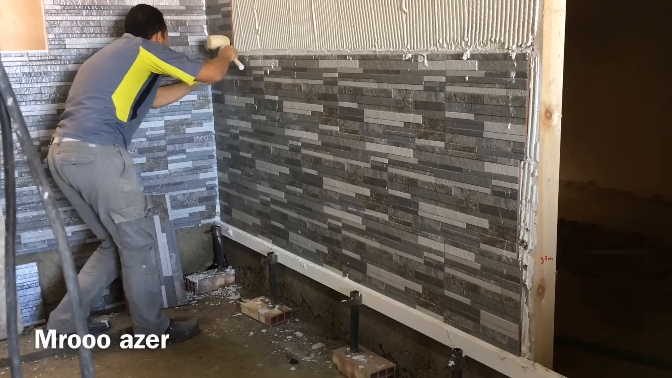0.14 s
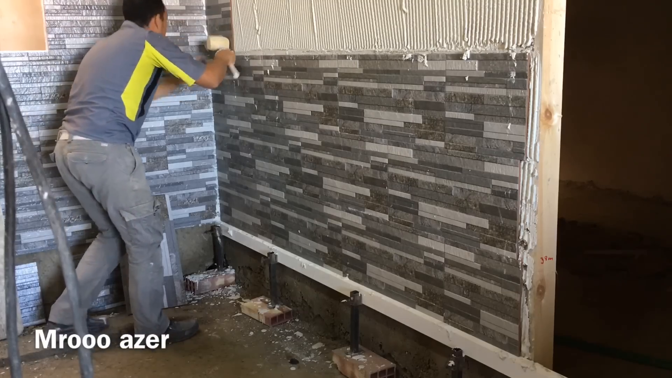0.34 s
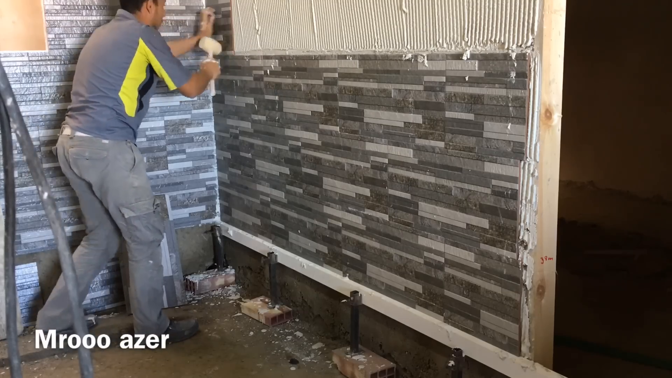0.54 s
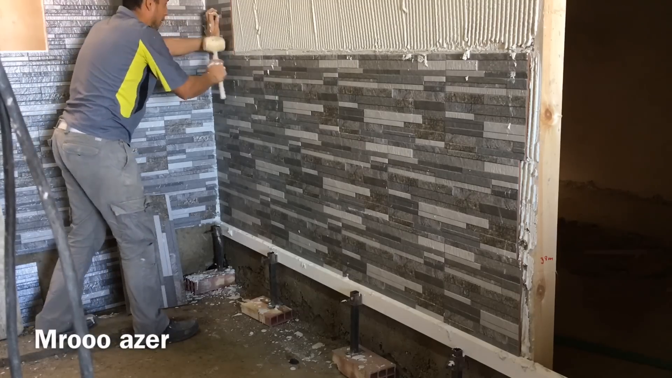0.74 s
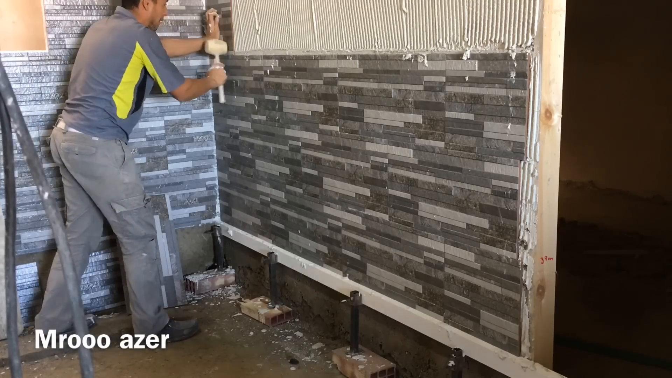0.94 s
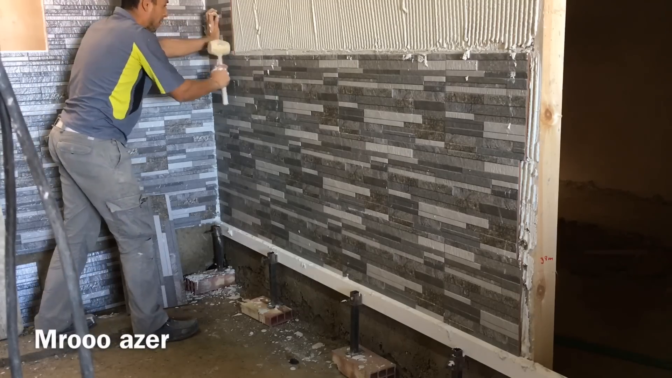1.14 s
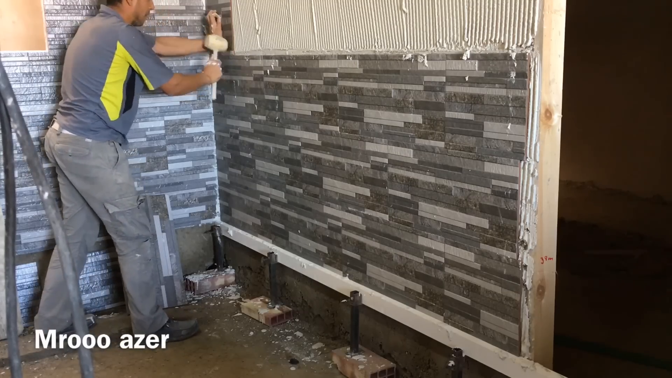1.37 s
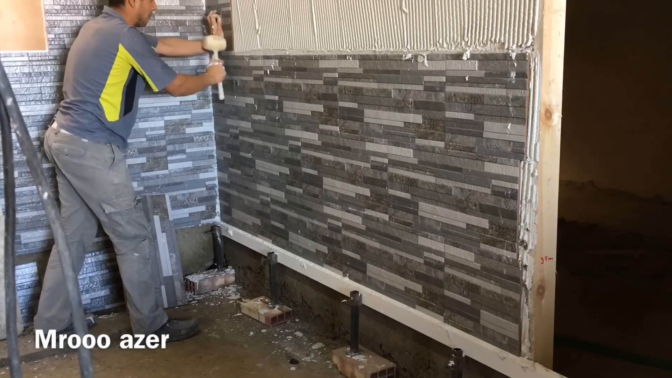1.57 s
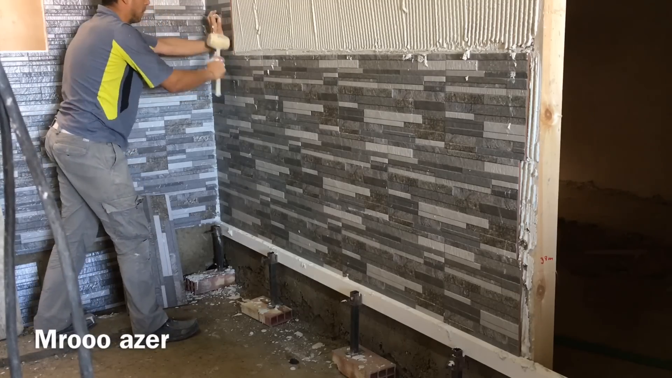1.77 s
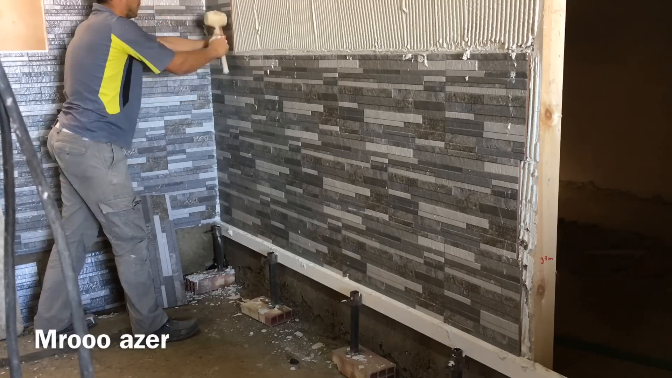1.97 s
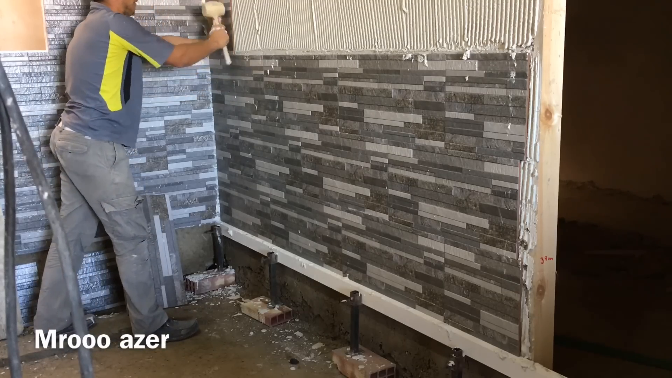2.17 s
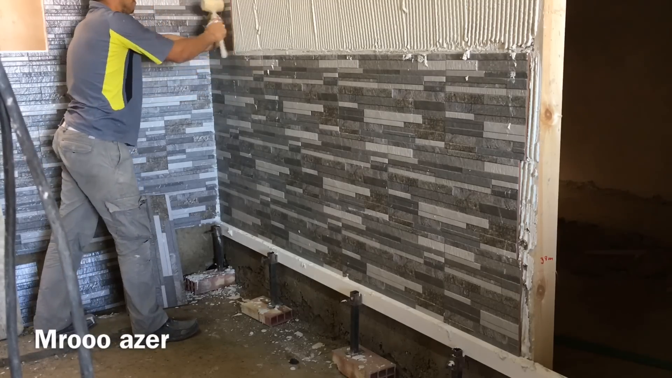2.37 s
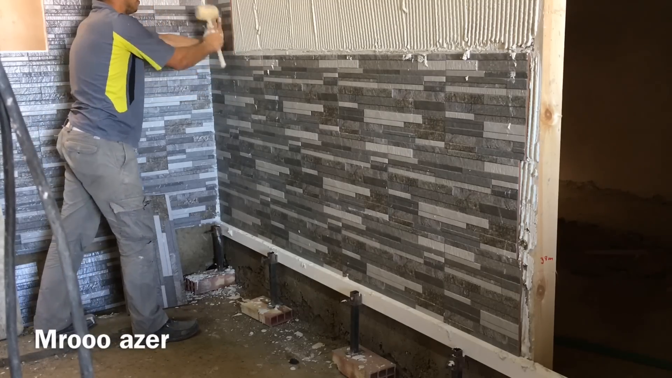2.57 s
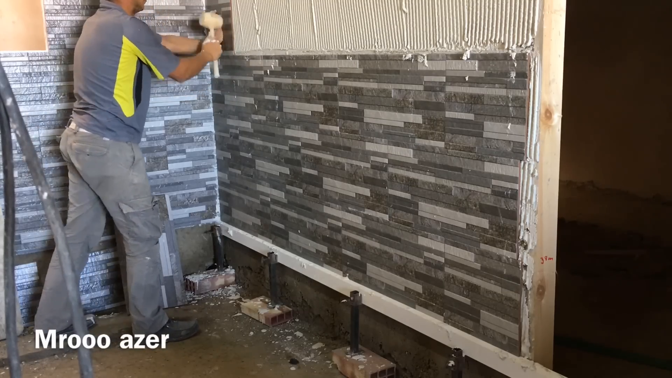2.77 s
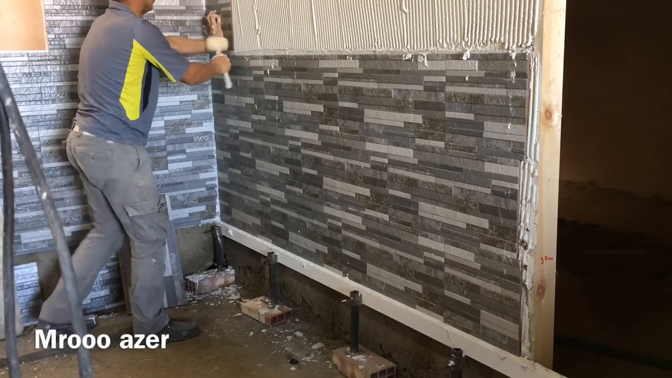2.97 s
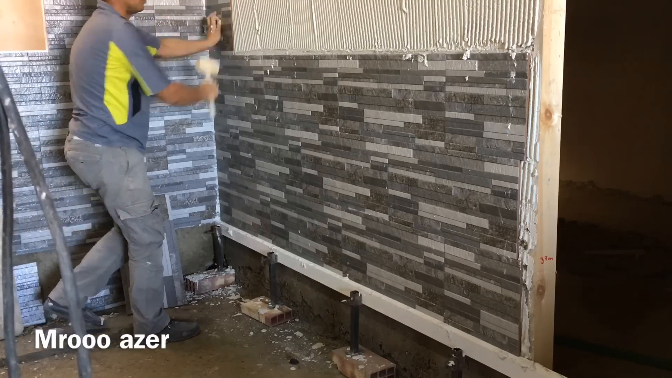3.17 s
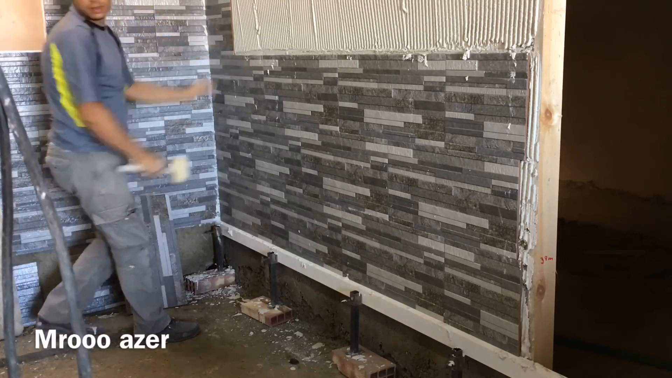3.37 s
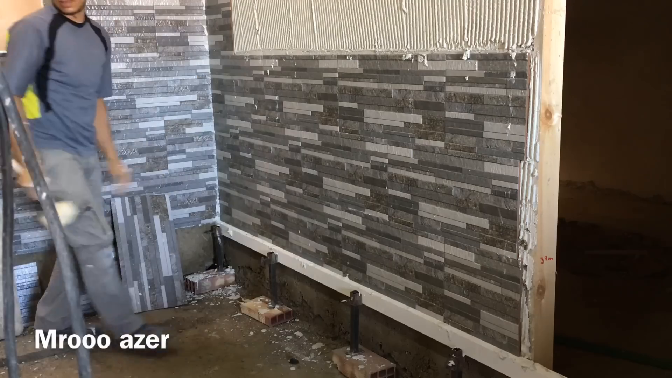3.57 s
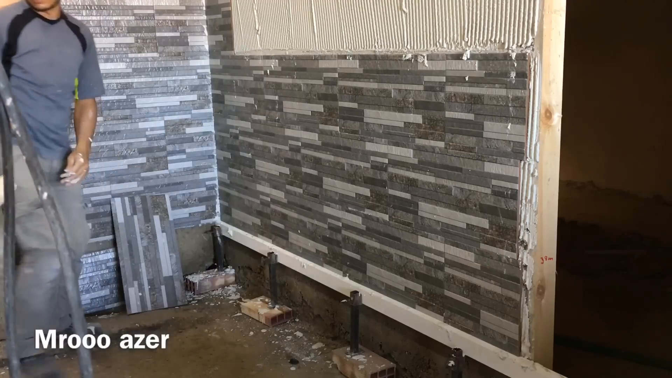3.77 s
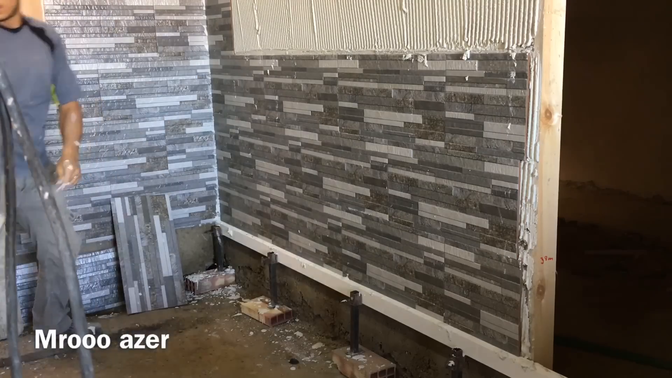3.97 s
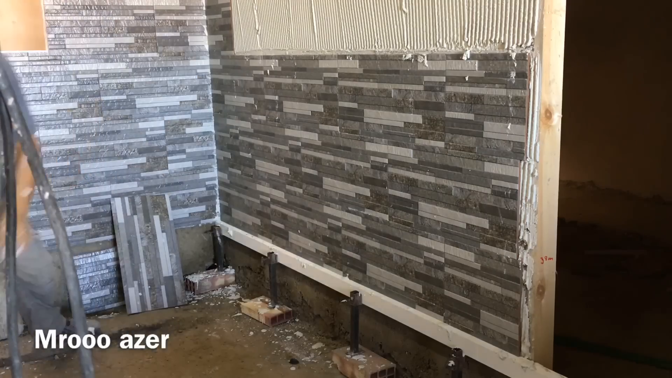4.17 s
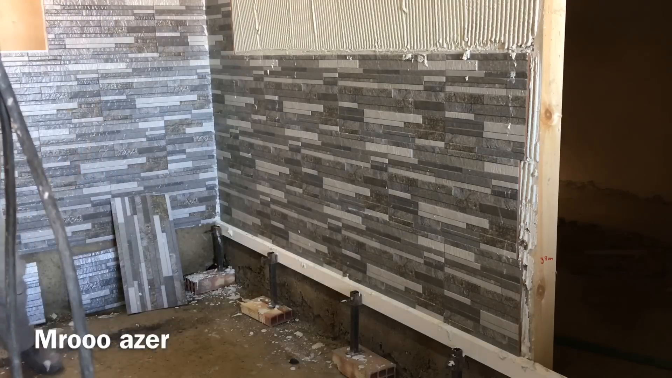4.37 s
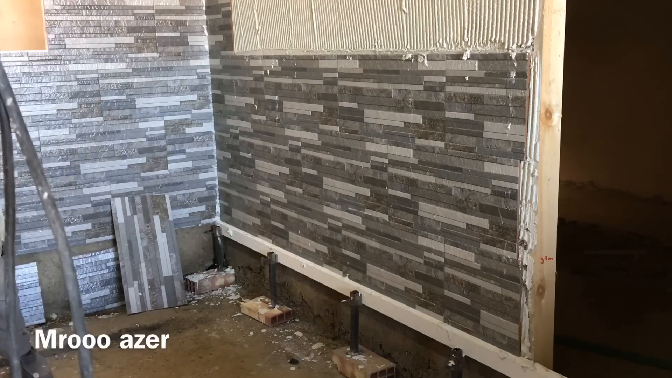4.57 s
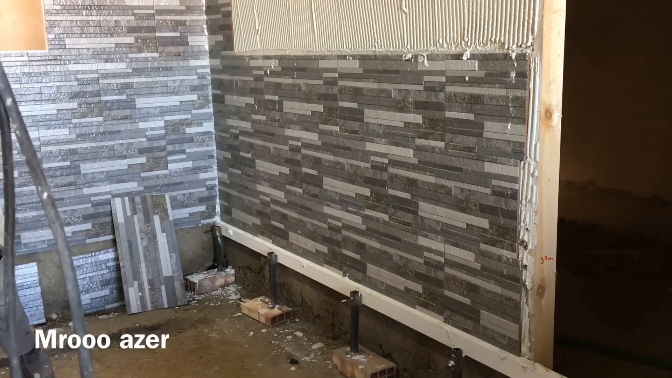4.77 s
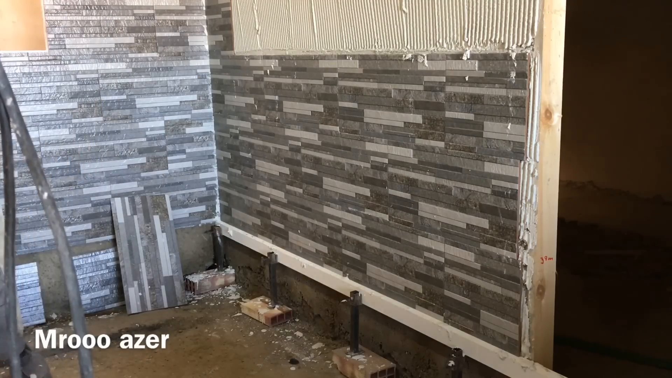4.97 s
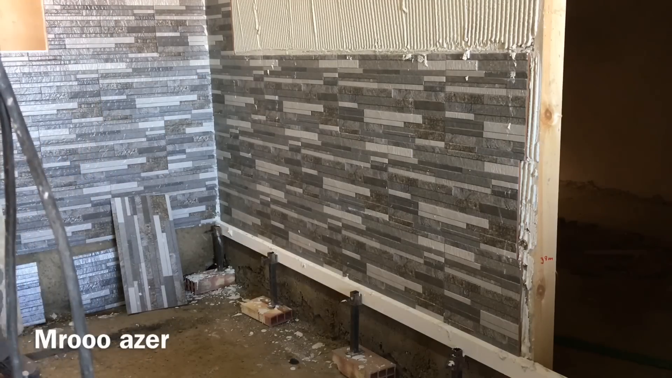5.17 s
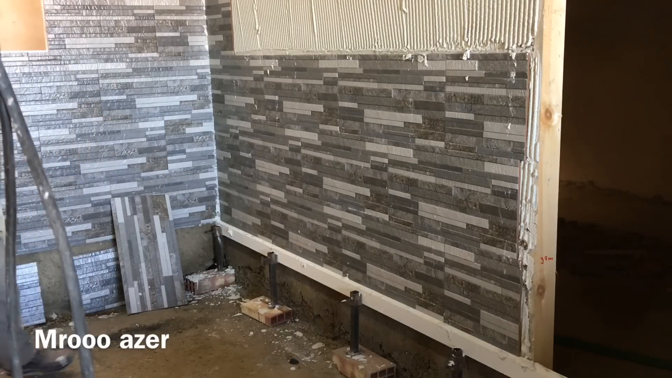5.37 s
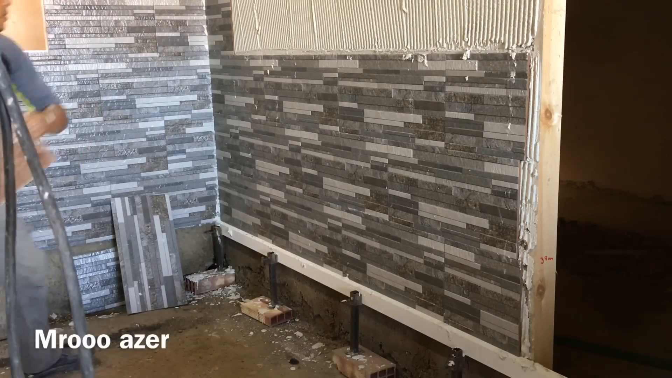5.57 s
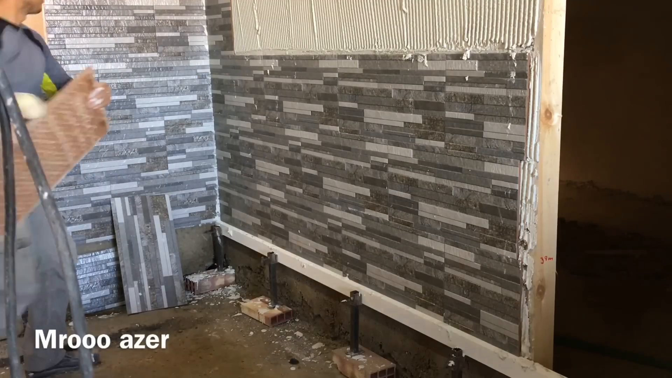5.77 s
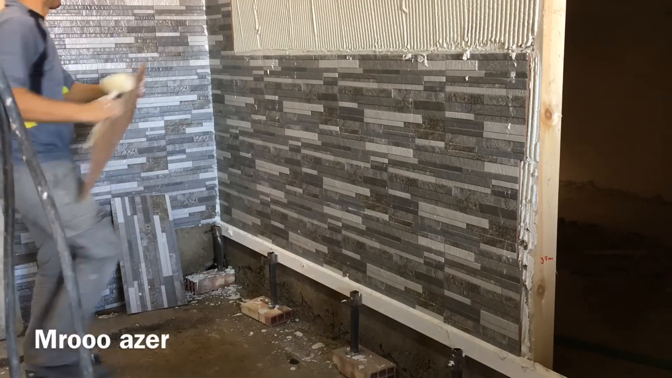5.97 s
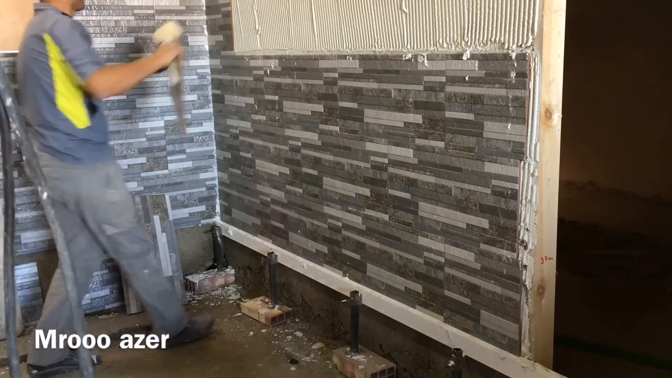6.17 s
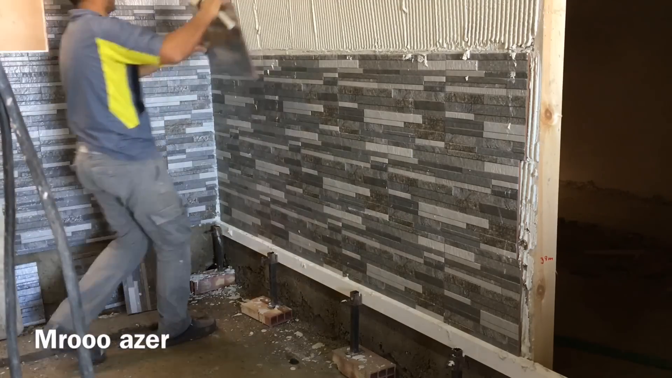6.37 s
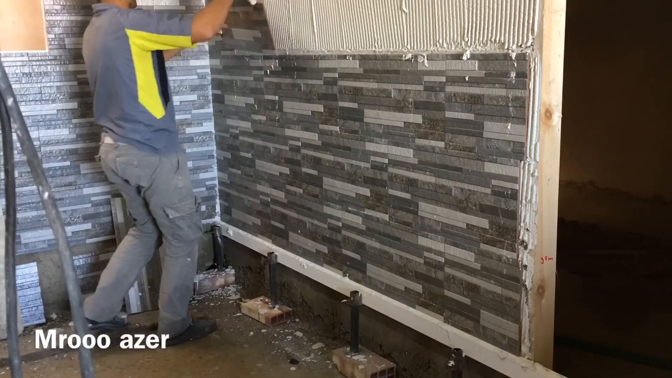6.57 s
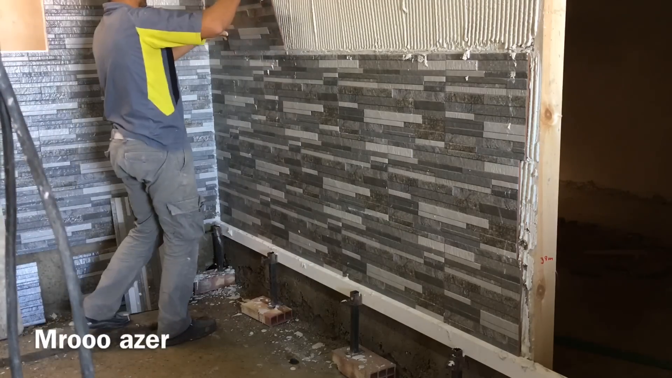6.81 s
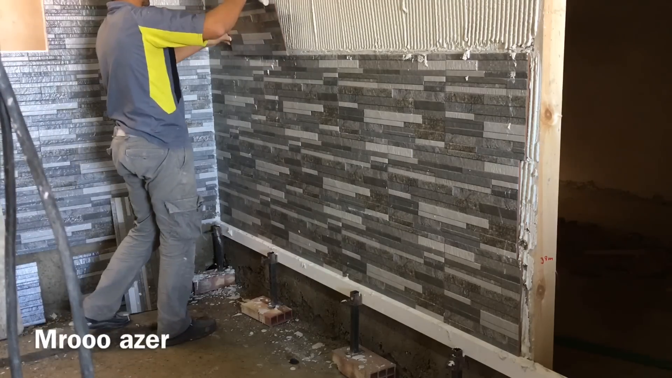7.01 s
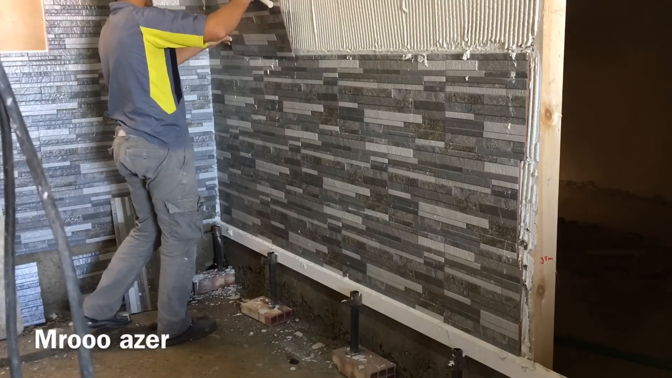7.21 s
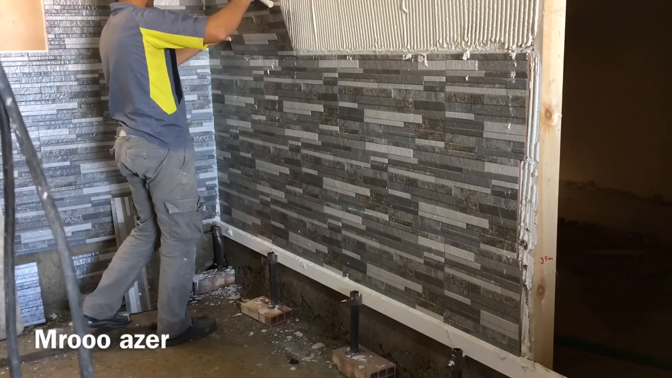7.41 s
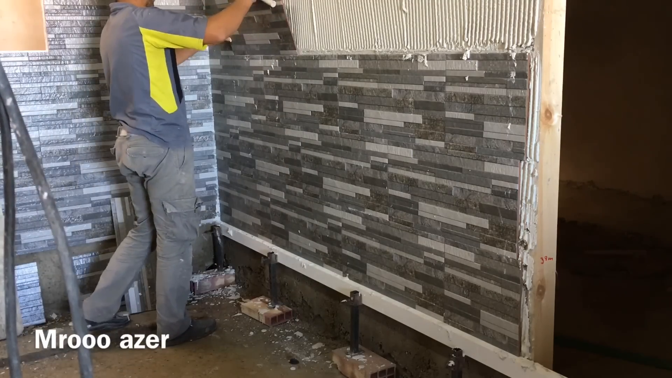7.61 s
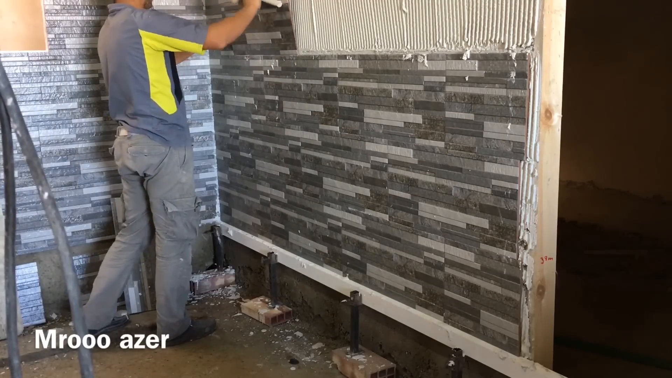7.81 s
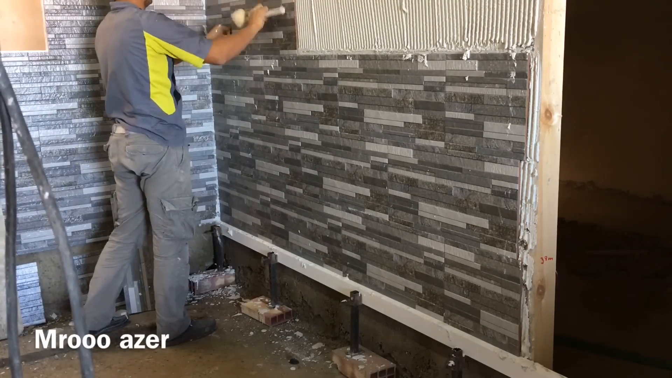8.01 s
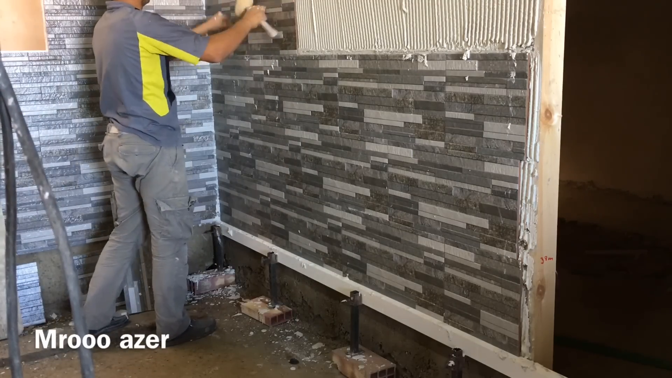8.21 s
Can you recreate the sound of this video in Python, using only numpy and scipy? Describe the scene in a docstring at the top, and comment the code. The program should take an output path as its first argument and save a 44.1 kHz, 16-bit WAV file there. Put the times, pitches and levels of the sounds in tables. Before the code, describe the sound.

Ten dull rubber mallet blows land on a wall tile, with a low hum swelling behind them and the hardest softly overloading the small, nearby microphone. The tapping stops and footsteps scuff across gritty concrete. A loose ceramic tile knocks and rings as it is handled, then rubs and clatters lightly against the wall. The room is bare and reverberant, with faint air noise throughout.

```python
"""A bare, echoing room with a gritty concrete floor; one small microphone, a tiler at work close by.
A rubber mallet beds a wall tile with ten dull blows that ring the wall and set the room booming.
The tiler then steps over the grit and handles a loose tile, which knocks, rings and scrapes into place.
Behind it all are faint air, shuffling, and a low drone in the room's deepest resonance.
The microphone overloads softly on the hardest blows."""
import sys
import numpy as np
from scipy import signal
from scipy.fft import rfft, irfft
from scipy.io import wavfile
from scipy.ndimage import uniform_filter1d

SR = 44100
rng = np.random.default_rng(int(sys.argv[2]) if len(sys.argv) > 2 else 0)


def to_wav(sig):
    """Store sig (one row per channel, or 1-D mono) as 16-bit WAV at the path in sys.argv[1].

    Samples outside -1..1 are clipped; the rate is SR.
    """
    pcm = np.clip(np.atleast_2d(sig), -1, 1) * 32767
    pcm = np.round(pcm).astype(np.int16)
    wavfile.write(sys.argv[1], SR, pcm.T)  # frames by channels


N = 363825

# mallet blows: start_s, force_db, thud_hz, slap_db, wall_db, crack_db, slap_tilt_db_per_octave
MALLET_BLOWS = [(0.813, -7.5, 355, -9.5, 3, -20.5, 0.5), (1.0109, -2, 375, -8.5, -12.5, -23.5, -0.7),
                (1.1958, -6, 386, -8, -0.5, -22.5, -0.6), (1.5811, -3.5, 402, -8, 1, -19, -3),
                (1.752, -6, 354, -5, -9, -16.5, -1.6), (2.029, -10.5, 434, -1.5, 13.5, -20.5, -4.5),
                (2.258, -5.5, 396, -5.5, 7.5, -20, 0), (2.4766, -7, 624, -7.5, 11.5, -15.5, -3.5),
                (2.7043, -9, 390, -9.5, 10, -27.5, -3), (3.0656, -14.5, 388, -11, 9.5, -21.5, 1)]
# grit on concrete: frequency_hz, density_db
GRIT_SPECTRUM = [(59, -73), (100, 1), (322, -0.5), (365, 10.5), (424, 2), (648, 7.5), (784, 3.5),
                 (950, 6.5), (2130, -0.5), (9020, -26.5), (16000, -44.5)]


def gain_of(db):
    """Decibels to amplitude."""
    return 10 ** (np.asarray(db) / 20)


def unit_rms(x):
    """Scales to unit rms."""
    return x / np.sqrt(np.mean(x ** 2) + 1e-20)


def curve_at(points, hz):
    """Reads a curve on a log-frequency axis."""
    point_hz, value = np.transpose(points)
    return np.interp(np.log(hz + 1), np.log(point_hz + 1), value)


def track(events, play):
    """Plays each row at its start time."""
    mix = np.zeros(N)
    for start_s, *settings in events:
        sound = play(*settings)
        part = mix[round(start_s * SR):][:len(sound)]
        part += sound[:len(part)]
    return mix


def coloured(x, spectrum, tilt_db=0):
    """Gives x a spectrum, tilted about 2 kHz by dB per octave, at unit rms."""
    hz = np.fft.rfftfreq(len(x), 1 / SR)
    shape_db = curve_at(spectrum, hz) + tilt_db * np.log2(hz / 2000 + .05)
    return unit_rms(irfft(rfft(x) * gain_of(shape_db), len(x)))


def ring(modes, lift_db, count, damping=1):
    """A sum of dying sines, each lifted by its own dB; peak 1."""
    hz, db, t60 = np.transpose(modes)[:, :, None]
    t = np.arange(count) / SR
    decay = gain_of(db + lift_db[:, None] - 60 * t * damping / t60)
    ringing = (decay * np.sin(2 * np.pi * hz * t)).sum(0)
    return ringing / abs(ringing).max()


def grit(count, spread_db=2.0):
    """Dense clicks of uneven size."""
    return rng.standard_normal(count) * gain_of(spread_db * np.minimum(rng.exponential(1, count), 4))


def room_air():
    """Steady room tone: a faint rumble with a little hiss."""
    # still air: frequency_hz, density_db
    air_spectrum = [(12, -30), (20, 16), (60, 0), (193, -10), (377, -5.5), (698, -11.5), (873, -17.5),
                    (1030, -23.5), (2460, -33.5), (4940, -35.5), (9140, -33.5), (14300, -32),
                    (16000, -55.5)]
    return gain_of(-54.5) * coloured(rng.standard_normal(N), air_spectrum)


def room_drone(pitch_hz=61, width_hz=14, swell_rise_s=0.09, swell_t60_s=3.2):
    """Noise twice through the room's deepest resonance: a wavering hum that each mallet blow swells."""
    # the drone beneath the swells: time_s, level_db
    base_levels = [(0.0, -41.5), (0.45, -52), (0.7, -58.5), (2.9, -46), (3.682, -48), (3.85, -62.5),
                   (5.3, -57.5), (6.9, -63), (7.699, -47.5), (8.25, -48.5)]
    time_s, level_db = np.transpose(base_levels)
    t = np.arange(N) / SR
    power = gain_of(np.interp(t, time_s, level_db)) ** 2
    for start_s, force_db, *_ in MALLET_BLOWS:
        age = np.maximum(t - start_s, 0)
        swell = gain_of(force_db - 28.5 - 60 * age / swell_t60_s) * (1 - np.exp(-age / swell_rise_s))
        power += swell ** 2
    resonance = [1, -np.exp(-np.pi * width_hz / SR)]
    noise = rng.standard_normal((N, 2)) @ [1, 1j]
    waver = signal.lfilter([1], resonance, signal.lfilter([1], resonance, noise))
    waver /= abs(waver) ** .5 + 1e-9  # shallower dips than plain noise
    hum = waver * np.exp(2j * np.pi * pitch_hz * t)
    octave = gain_of(-11.5) * unit_rms((hum ** 2).real)
    return np.sqrt(power) * (unit_rms(hum.real) + octave)


def shuffle():
    """Soles, clothes and tile edges rub: grit noise whose level and tilt follow the movement."""
    # the tiler's movement: time_s, level_db, tilt_db_per_octave
    movement = [(0.0, -64.5, -2.5), (0.45, -60.5, 4.5), (0.73, -56, 0.5), (1.201, -48, -1), (2.3, -55, -1),
                (2.869, -64, 3.3), (3.602, -65, 4.5), (4.299, -60, -3.5), (4.72, -76, 7),
                (4.95, -59.5, 3.5), (5.348, -51.5, 4.5), (5.8, -56.5, 4), (6.0, -57.5, 5.5),
                (6.201, -58.5, 4), (6.869, -70, -11), (7.301, -49, 2), (7.65, -58, 6), (8.03, -39.5, 0),
                (8.25, -60.5, 2.5)]
    time_s, level_db, tilt_db = np.transpose(movement)
    hz, t, bands = signal.stft(coloured(grit(N), GRIT_SPECTRUM), SR, nperseg=512)
    colour_db = np.interp(t, time_s, np.clip(tilt_db, -4, 9)) * np.log2(hz / 2000 + .2)[:, None]
    flicker_db = 1.4 * unit_rms(uniform_filter1d(rng.standard_normal(len(t)), size=4))
    bands *= gain_of(np.interp(t, time_s, level_db) + colour_db + flicker_db)
    return signal.istft(bands, SR, nperseg=512)[1][:N]


def footstep(level_db, length_s, tilt_db):
    """Grit crunches while the sole rolls down, its grains breaking in bunches."""
    t = np.arange(SR // 2) / SR
    bunches = gain_of(2.0 * unit_rms(uniform_filter1d(rng.standard_normal(len(t)), size=200)))
    weight = (1 - np.exp(-t / min(.004, length_s / 6))) * np.exp(-(t / max(length_s, .005)) ** 1.4)
    return gain_of(level_db) * coloured(grit(len(t), 3.3), GRIT_SPECTRUM, tilt_db) * bunches * weight


def edge_chatter(contact_s, count=2600):
    """The tile's rough edge lands in a scatter of tiny touches."""
    t = np.arange(count) / SR
    touches = grit(count, 5.0) * (rng.random(count) < .012) * np.exp(-(t / contact_s) ** 2)
    touches *= np.minimum(t / (.3 * contact_s), 1)  # a long contact creeps in
    touches[0] = min(.008 / contact_s, 2)
    return touches


def tile_plate(hardness_db, spot_hz, damping, singing_hz, contact_s):
    """The loose tile rings in its plate modes; a hard contact favours the high ones."""
    # plate modes: pitch_hz, level_db, t60_s
    plate_modes = [(603, 3, 0.9), (845, -6, 0.45), (980, -4, 0.5), (1050, 0, 0.35), (1235, -2, 0.5),
                   (1335, -9, 0.28), (1428, -5, 0.5), (1490, 0, 0.5), (1723, -6, 0.45), (1805, -9, .4),
                   (1916, -1, 0.28), (1943, -6, .4), (2153, -8, 0.21), (2293, -6, 0.25), (2420, 0, 0.3),
                   (2487, -6, 0.3), (2606, -8, 0.24), (2977, -11, 0.4), (3106, -8, 0.3), (3160, -10, .4),
                   (3359, -13, .4), (3418, -10, 0.45), (3620, -10, .25), (3736, -14, 0.25),
                   (3828, -15, 0.12), (4330, -15, 0.2), (4640, -16, 0.25), (5080, -18, 0.17),
                   (5340, -16, 0.18), (5950, -20, 0.18), (6300, -19, .13), (6600, -16, 0.13),
                   (6830, -18, 0.14), (7350, -19, .2), (7620, -20, .2), (8640, -17, 0.14),
                   (9190, -17, 0.24), (9350, -19, .2), (10800, -21, .08), (11700, -21, 0.09),
                   (13600, -23, .07), (14200, -24, .06)]
    hz, count = np.array(plate_modes)[:, 0], SR * 2 // 5
    spot_db = 8 * np.exp(-(np.log2(hz / spot_hz) / 0.34) ** 2)
    # the modes that the contact point drives best are lifted, and the hold damps them less
    sings = sum(np.exp(-(np.log2(hz / pitch) / .012) ** 2) for pitch in singing_hz)
    mode_damping = max(damping, .3) * (1 - .35 * np.minimum(sings, 1))
    lift_db = hardness_db * np.log2(hz / 2000) + spot_db + 5.5 * sings
    lift_db += 1.5 * rng.standard_normal(len(hz))
    touches = edge_chatter(max(contact_s, .001))
    drive = abs(np.exp(2j * np.pi * np.outer(hz, np.arange(len(touches)) / SR)) @ touches)
    lift_db -= 18 * np.log10(drive + .3)  # chatter favours no mode for long
    plate = signal.oaconvolve(ring(plate_modes, lift_db, count, mode_damping[:, None]), touches)[:count]
    return plate / abs(plate).max()


def tile_knock(force_db, hardness_db, spot_hz, bend_hz, bend_db, damping, thump_db,
               sing_hz, second_sing_hz, contact_s):
    """The held tile lands: it rings, bends, scrapes the grit and thumps the wall or floor."""
    # wall or floor under the tile's weight: frequency_hz, density_db
    thump_spectrum = [(60, -17), (120, -2.5), (280, 2), (600, -2.5), (2000, -78)]
    plate = tile_plate(hardness_db, spot_hz, damping, (sing_hz, second_sing_hz), contact_s)
    t = np.arange(len(plate)) / SR
    bend = np.sin(2 * np.pi * bend_hz * t) * gain_of(bend_db - 60 * t * damping / 2.2)
    bend *= 1 - np.exp(-t / (0.2 * contact_s + 0.001))
    bend *= 1 - .92 / (1 + np.exp(-(t - .078) / .01))  # fingers close and take most of the bending
    scrape = coloured(grit(len(t), 3.5), GRIT_SPECTRUM, hardness_db)
    scrape *= np.exp(-t / (0.016 + contact_s)) * (1 - np.exp(-t / 0.003))
    thump = coloured(rng.standard_normal(len(t)), thump_spectrum)
    thump *= np.exp(-t / 0.089) * (1 - np.exp(-t / 0.0059))
    return gain_of(force_db) * (plate + bend + gain_of(-20) * scrape + gain_of(thump_db) * thump)


def room_boom(t):
    """Each low room resonance is a close cluster, and every blow wakes other members of it."""
    # low room resonances: pitch_hz, level_db, t60_s
    low_modes = [(108, -10, .5), (122, -10, .7), (136, -1, .8), (169, 0, .45), (248, -2, .35),
                 (290, -8, .4), (313, -3, .4), (352, -5, .55), (404, -6, .3)]
    cluster = np.array(low_modes + low_modes)
    cluster[:, 0] *= 1 + .035 * rng.uniform(-1.15, 1, len(cluster))
    build = 1 - np.exp(-t / 0.006)  # as the first reflections return
    return build * ring(cluster, 3.2 * rng.standard_normal(len(cluster)), len(t))


def mallet_blow(force_db, thud_hz, slap_db, wall_db, crack_db, slap_tilt_db):
    """The soft head pushes and rebounds, waking wall and room; its face slaps the glaze."""
    # tile bedded in mortar: pitch_hz, level_db, t60_s
    wall_modes = [(254.7, 12.5, 0.095), (318.7, 26, 0.033), (419, -12, 0.031), (558, 16, 0.027),
                  (664, -13.5, 0.07), (775, -6.5, 0.19), (1100, -24.5, 0.03)]
    # slap of the rubber face: frequency_hz, density_db
    slap_spectrum = [(410, -50), (700, 3), (1300, -3), (1580, -7), (2400, -12), (3400, -21), (5400, -39.5),
                     (6920, -32.5), (13000, -35.5), (16000, -55.5)]
    # sharp crack off the glaze: frequency_hz, density_db
    crack_spectrum = [(1000, -39.5), (3000, -6), (4100, 4.5), (5300, -3), (7000, -6.5), (11500, -15),
                      (16000, -8.5)]
    count = SR * 3 // 5
    t = np.arange(count) / SR
    thud = -np.sin(2 * np.pi * thud_hz * t) * ((t / 0.0013) * np.exp(1 - t / 0.0016)) ** 3
    rise = 1 - np.exp(-t / 0.0025)
    spot_db = 2 * rng.standard_normal(len(wall_modes))  # every blow lands on another spot
    wall = -gain_of(wall_db) * rise * ring(wall_modes, spot_db, count)
    boom = gain_of(-6.5 + 0.34 * wall_db) * room_boom(t)
    slap = gain_of(slap_db) * coloured(rng.standard_normal(count), slap_spectrum, slap_tilt_db)
    slap *= rise * (np.exp(-t / 0.0044) + 0.093 * np.exp(-t / 0.045))
    crack = coloured(rng.standard_normal(count), crack_spectrum)
    crack *= np.exp(-t / 0.002) + 0.22 * np.exp(-t / 0.014)
    crack *= gain_of(crack_db) / abs(crack).max()
    return gain_of(force_db) * (thud + wall + boom + slap + crack)


def early_echoes(x):
    """First reflections at the microphone, dulled by the rough walls."""
    # corner, floor, ceiling and far walls: delay_s, level_db
    reflections = [(.0027, -6), (.0073, -1.5), (.0098, -11.5), (0.0137, -3.5), (.017, -2.5), (.024, -36.5)]
    taps = np.zeros(SR // 20)
    for delay_s, level_db in reflections:
        taps[round(delay_s * SR)] = gain_of(level_db)
    return signal.oaconvolve(x, uniform_filter1d(taps, size=5))[:N]


def room_tail(x):
    """Sparse echoes of random sign, each band dying at its own speed."""
    # the room's decay: frequency_hz, t60_s
    decay_times = [(100, 1.21), (350, 0.93), (720, 0.96), (950, 0.74), (2400, 0.47), (6400, 0.45),
                   (15000, 0.14)]
    taps, slots = np.zeros(SR), np.arange(700, SR - 20, 20)
    taps[slots + rng.integers(0, 20, len(slots))] = rng.choice([-1., 1.], len(slots))
    hz, t, bands = signal.stft(taps, SR, nperseg=512)
    decay = gain_of(-60 * t / curve_at(decay_times, hz)[:, None])
    tail = signal.istft(bands * decay, SR, nperseg=512)[1]
    tail *= gain_of(0.5) / np.linalg.norm(tail)
    return signal.oaconvolve(x, tail)[:N]


def scene():
    """Mallet, tile and feet, each with its own share of the room, over the background; mono."""
    # loose tile knocks: start_s, force_db, hardness_db_per_octave, spot_hz, bend_hz, bend_db,
    # damping_factor, thump_db, sing_hz, second_sing_hz, contact_s
    knocks = [(5.21, -40, 7.5, 3070, 366, -7.5, 1.9, -6, 3106, 5080, 0.019),
              (5.283, -16.5, 4.5, 1730, 373, -29, 4.2, -26.5, 5080, 5950, 0.017),
              (5.596, -10, -1.2, 1510, 355, 0, 2.5, -23, 603, 2420, 0.0078),
              (5.785, -24, 5.5, 1800, 345, -6.5, 3.1, -21, 3160, 3106, 0.015),
              (5.921, -34.5, -0.5, 946, 354.4, -0.5, 2.2, -4.5, 603, 1050, 0.015),
              (6.446, -33.5, 6, 1960, 360, -29, 8.7, -42, 1916, 2420, 0.00082),
              (7.138, -23.5, 3.5, 1140, 302, -11, 3.3, -12, 1723, 1235, 0.022),
              (7.305, -29.5, 7, 2560, 309, -19, 2.7, -13.5, 2977, 1916, 0.017),
              (7.437, -28, 3.5, 1900, 389.6, -15.5, 2.2, -19, 1805, 2293, 0.061),
              (7.486, -15.5, 6, 1970, 295, -34, 4.2, -26, 3418, 1805, 0.018),
              (7.607, -33.5, 5.5, 1030, 317, 1.5, 5, -3.5, 1050, 1916, 0.0086),
              (7.737, -43.5, 6, 2470, 350, -12, 0.6, -17, 3106, 2420, 0.018),
              (7.862, -42.5, 4, 1190, 456, -2.5, 0.32, -23, 2293, 1050, 0.0086),
              (7.952, -27, 3, 1170, 421, -7, 4.7, -30, 1050, 2420, 0.02),
              (7.991, -18.5, 0, 1010, 377, 2, 9.7, -14, 1050, 1235, 0.016),
              (8.084, -41, 16, 1070, 387, 9, 0.87, 6.5, 1050, 1235, 0.0048)]
    # shoes on grit: start_s, level_db, length_s, tilt_db_per_octave
    steps = [(0.214, -60, 0.15, 9), (0.39, -54, 0.075, 4.5), (3.273, -60, 0.17, 26),
             (3.762, -53, 0.18, 3.5), (4.139, -53.5, 0.29, 5.5), (4.311, -46, 0.024, 3),
             (4.521, -40.5, 0.08, 5.5), (4.538, -54, 0.0065, 2), (4.6, -36, 0.11, 1.5),
             (4.604, -34, 0.011, 1.5), (4.862, -44, 0.0062, -11), (4.833, -48, 0.082, 2),
             (6.182, -52, 0.12, 3.5), (6.307, -49, 0.067, 6), (6.339, -52.5, 0.081, 5.5),
             (6.427, -57, 0.018, 9), (6.438, -47, 0.029, 5), (6.477, -58.5, 0.13, 7),
             (6.602, -43.5, 0.13, 2.5), (6.611, -42.5, 0.024, 12), (6.342, -46, 0.0062, 6),
             (7.93, -47, 0.012, 19), (8, -44, 0.062, 12)]
    mallet = track(MALLET_BLOWS, mallet_blow)
    tile = track(knocks, tile_knock)
    feet = track(steps, footstep)
    # the stiff wall gives off no deep bass, and a small plate sends little bass into the room
    mallet = signal.sosfilt(signal.butter(3, 100, "high", fs=SR, output="sos"), mallet)
    tile_highs = signal.lfilter(*signal.butter(6, 720, "high", fs=SR), tile)
    sent = gain_of(-6.5) * mallet + gain_of(-5) * tile_highs + gain_of(-29) * tile + gain_of(-10) * feet
    drift = 2 * np.pi * np.arange(N) / SR / 2.6  # the work moves along the wall, so the echoes drift
    room = early_echoes(sent) + room_tail(sent * np.cos(drift)) + room_tail(sent * np.sin(drift))
    return (room_air() + shuffle() + room_drone() + room + feet + tile + mallet)[None]


def record(dry, bass_cut_hz=44, ceiling=.99, top_hz=16150):
    """The small microphone drops the deepest bass, overloads softly and loses the highest treble."""
    thin = signal.sosfilt(signal.butter(4, bass_cut_hz, "high", fs=SR, output="sos"), dry)
    limited = thin / (1 + abs(thin / ceiling) ** 8) ** .125
    band_limit = signal.firwin(511, top_hz, window=("kaiser", 9), fs=SR)
    return signal.oaconvolve(limited, band_limit[None], "same")


dry = scene()
out = record(dry)
to_wav(out)
```